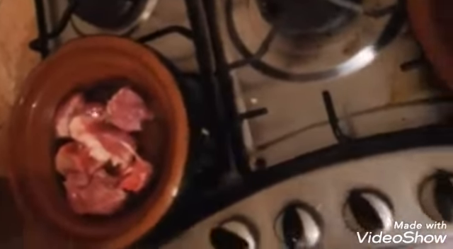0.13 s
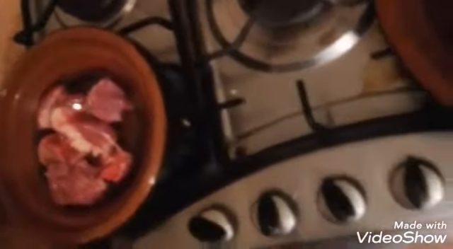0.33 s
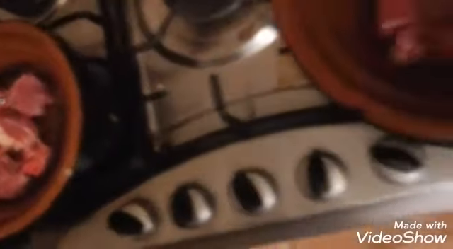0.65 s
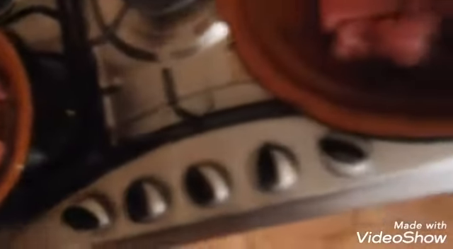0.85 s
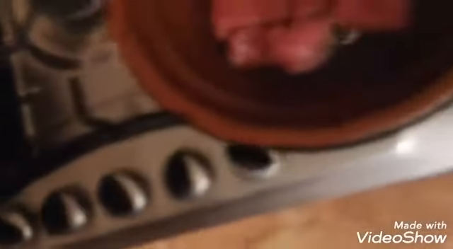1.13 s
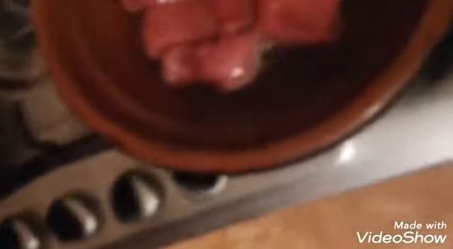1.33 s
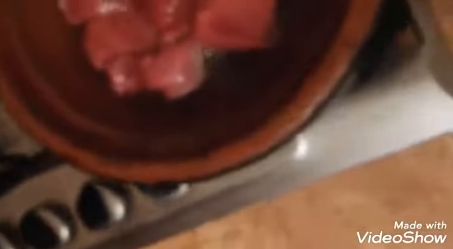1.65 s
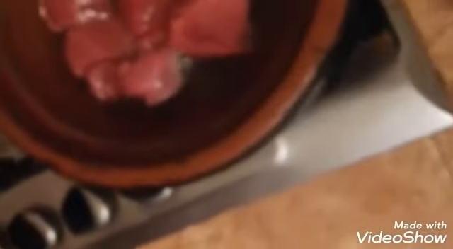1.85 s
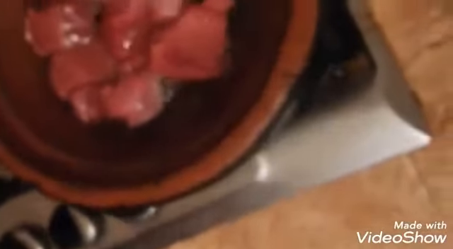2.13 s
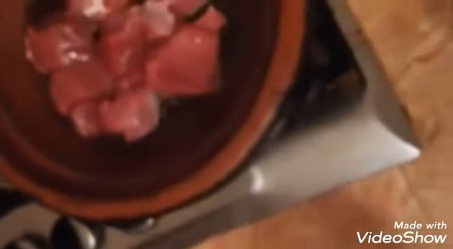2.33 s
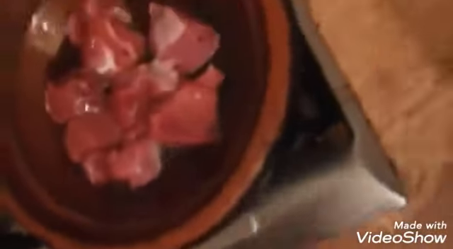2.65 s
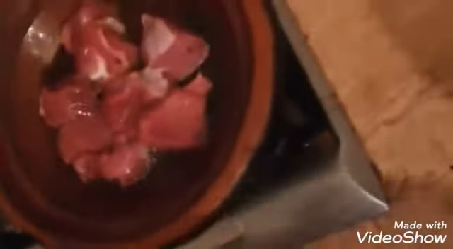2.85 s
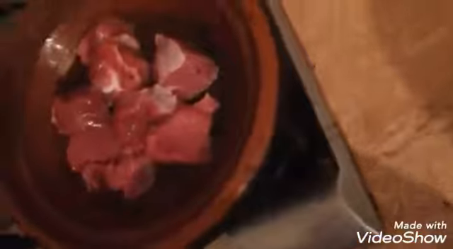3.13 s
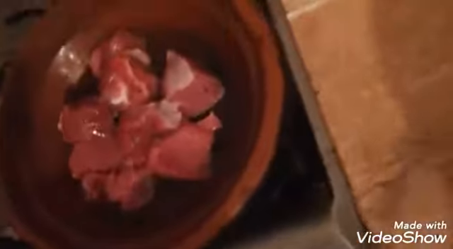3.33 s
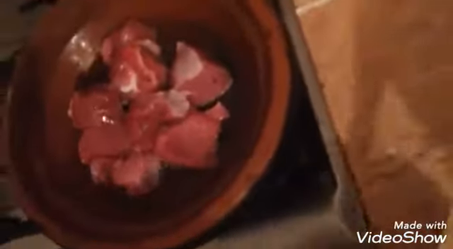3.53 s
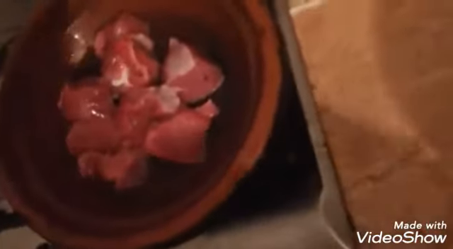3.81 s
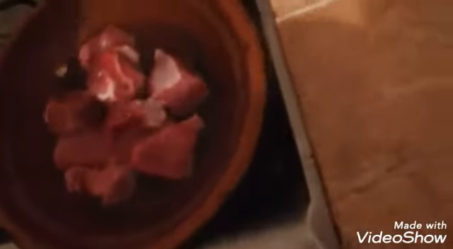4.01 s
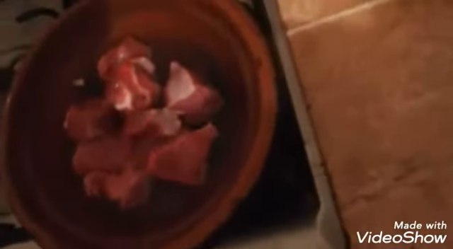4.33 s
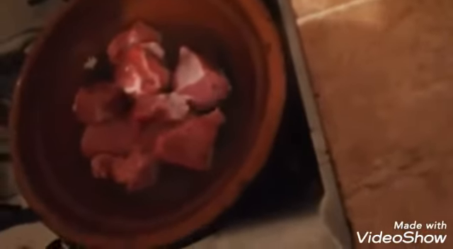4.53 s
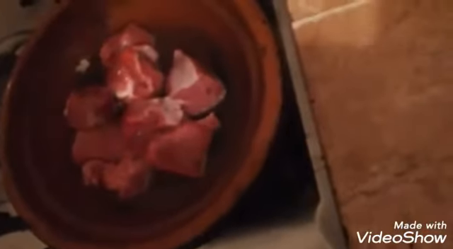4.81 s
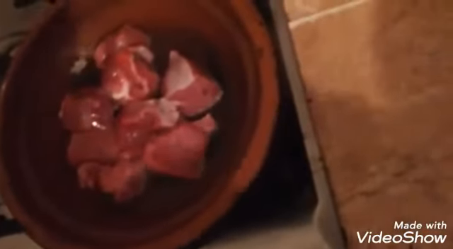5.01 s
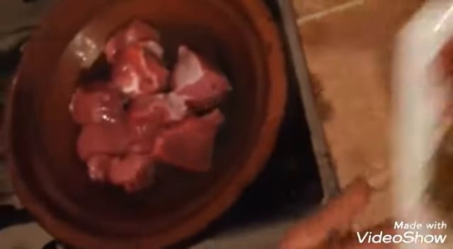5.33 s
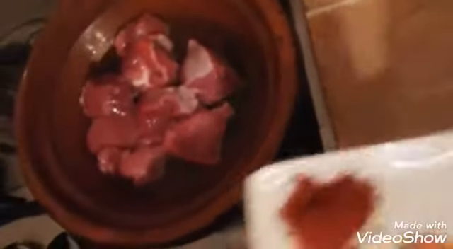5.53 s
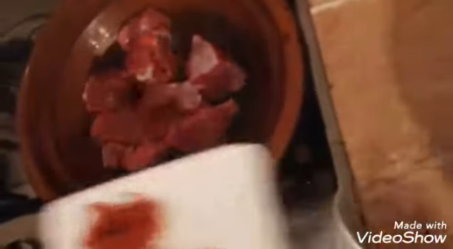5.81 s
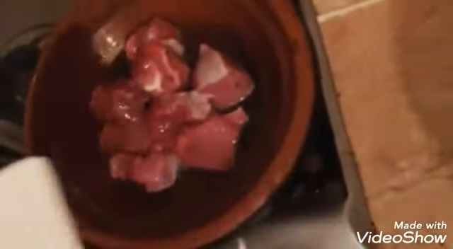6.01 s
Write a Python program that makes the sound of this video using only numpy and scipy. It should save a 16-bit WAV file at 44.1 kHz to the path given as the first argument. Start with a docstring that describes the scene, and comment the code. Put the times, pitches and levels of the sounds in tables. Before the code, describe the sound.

Meat sizzles softly in a clay pot throughout, heard close up in a small kitchen over the faint rush and hum of a gas flame. The frying is strongest at the start, with little spits of fat, then eases. Objects are set down with dull thuds right at the beginning and more softly around 1 second. At about 1.5 seconds a cupboard door bumps shut with a hollow boom. Near 3.2 seconds a utensil is laid down and rattles briefly. A plastic tub lid snaps sharply at 4 seconds, creaks faintly, and snaps again at about 4.4, the loudest moment. Crockery clinks and rings at 4.6 seconds, then rocks and slides faintly on the worktop. From 5 seconds more drops of fat pop, with a couple of soft thuds near 5.7, and the sizzle carries on to the end, just after 6 seconds.

```python
"""A small kitchen, heard close up: meat sizzles softly in a clay pot over a rushing, humming gas ring.
Steam bubbles hiss and crackle, and now and then a drop of fat spits. Beside the stove things are set
down, a cupboard door bumps shut, a utensil rattles, a spice tub's lid snaps twice and crockery clinks
and slides on the worktop. Each hit is a noise burst plus ringing modes, with a short room tail."""
import sys
import numpy as np
from scipy import signal
from scipy.fft import rfft, irfft, next_fast_len
from scipy.io import wavfile

SR = 44100
rng = np.random.default_rng(int(sys.argv[2]) if len(sys.argv) > 2 else 0)


def generate_wav(signal):
    """Clip the signal to [-1, 1] and save it as 16-bit WAV at the path in sys.argv[1]."""
    frames = np.transpose(np.atleast_2d(signal))
    scaled = np.clip(frames, -1, 1) * 32767
    pcm = np.round(scaled).astype(np.int16)
    wavfile.write(sys.argv[1], SR, pcm)


N = 271777
AGE = np.arange(30870) / SR  # time since a hit, t/s

# kitchen reverb decay: f/Hz, t60/s
ROOM_DECAY = [(150, 0.78), (500, 0.9), (1500, 0.49), (5000, 0.38), (12000, 0.3)]
# fader ride of the sizzle, highest while the microphone is close to the pot: t/s, level/dB
SIZZLE_RIDE = [(0.0, -43.5), (2.11, -49.5), (4.1, -49.5), (4.2, -48.5), (5.56, -50), (6.16, -48)]
# tone of the frying: f/Hz, level/dB
FRYING_EQ = [(80, -16), (200, -4.5), (500, 2.5), (900, 4.5), (1300, 1.5), (2000, 3), (2900, 2), (4000, 1),
             (5700, 2.5), (7500, -2.5), (11000, -2.5), (14000, -4.5), (16000, -52)]
# tone of the gas flame: f/Hz, level/dB
FLAME_EQ = [(20, 10.5), (45, 0.5), (75, -18), (120, -6.5), (180, 4.5), (300, 8), (450, 7), (700, -5.5),
            (1300, 12.5), (2500, -64), (6000, -8)]
# things set down or shifted: t/s, level/dB, low-pass/Hz, contact t60/s, hollow note/Hz, note/dB
THUD_CUES = [(0.0, -26.5, 1260, 0.25, 772, -10), (0.1847, -24.5, 1610, 0.012, 1204, -15),
             (.191, -26.5, 1260, 0.028, 413, -11), (.975, -36, 1150, 0.14, 420, -3.5),
             (1.018, -42, 1130, 0.13, 638, 4), (3.06, -41.5, 2300, 0.26, 202, -5.5),
             (3.575, -46, 1800, 0.11, 573, -9), (5.685, -40, 2570, 0.49, 367, -5.5),
             (5.751, -42.5, 1590, 0.24, 365, -1.5)]
# tone shared by those thuds: f/Hz, level/dB
THUD_EQ = [(70, -42), (140, -12), (260, -9), (400, -1), (700, 1.5), (1000, -2), (1500, 2.5), (3000, -3)]
# the loudest spits of fat: t/s, level/dB, f/Hz, width/Hz
SPIT_CUES = [(0.147, -44, 3070, 500), (0.2694, -41.5, 2960, 650), (0.2883, -41, 2650, 600),
             (.308, -46, 3800, 1500), (.3314, -43.5, 5200, 7000), (0.446, -46, 2530, 500),
             (.5153, -47.5, 3170, 550), (0.5438, -44, 5600, 3530), (0.59, -41.5, 2540, 480),
             (.645, -40.5, 3600, 9000), (0.689, -44, 2500, 900), (.689, -39, 5270, 5000),
             (0.7825, -44.5, 2910, 400), (.798, -46, 3200, 6000), (.8455, -43, 2950, 400),
             (.866, -46, 2970, 400), (.971, -48, 2500, 450), (0.988, -40, 2900, 350),
             (1.02, -48, 2700, 350), (1.0656, -48, 2850, 350), (1.084, -47, 2800, 350),
             (1.1402, -45, 3700, 2200), (1.149, -50, 2800, 900), (1.349, -47.5, 4180, 4500),
             (1.7803, -41.5, 2100, 3000), (5.148, -49, 2530, 400), (5.169, -47, 3020, 450),
             (5.184, -47, 3000, 352), (5.254, -45.5, 3500, 500), (5.301, -44.5, 2730, 700),
             (5.34, -46, 3300, 400), (5.369, -47.5, 3320, 400), (5.445, -50, 3180, 550),
             (5.5127, -43, 5800, 8000), (5.643, -42, 2850, 480), (6.003, -38.5, 3080, 500),
             (6.087, -38.5, 3400, 1014)]
# the door brushes its frame, then meets it: t/s, level/dB, ring/dB, low-pass/Hz
DOOR_CUES = [(1.441, -41, -4, 2000), (1.456, -35.5, 4.5, 2000), (1.5249, -25.5, 6.5, 750),
             (1.5407, -26, 12, 3000), (1.55, -25.5, -7, 3020)]
# tone of the door's knock: f/Hz, level/dB
DOOR_EQ = [(60, -31), (110, -20), (160, -5), (240, -5.5), (380, 5.5), (600, 4), (800, 2.5), (1000, -1.5),
           (1350, 2.5), (1900, -17.5), (2600, -14), (4000, -53)]
# the cupboard's boom: f/Hz, level/dB, t60/s
CUPBOARD_MODES = [(143, -11, 0.4), (203, -12, 0.5), (288, -7, 0.35), (356, -2, 0.4), (431, 3, 0.4),
                  (501, 1, 0.38), (544, 3, 0.38), (623, 4.5, 0.4), (687, 1.5, 0.36), (755, 1.5, 0.33),
                  (829, -3, 0.33), (883, -3, 0.33), (1112, -7, 0.48), (2570, -19, 0.35)]
# the latch rings as it first brushes the frame: t/s, level/dB, f/Hz, t60/s
LATCH_CUES = [(1.446, -41.5, 2385, 0.3)]
# slides on the worktop: t/s, length/s, level/dB, f/Hz, width/Hz
SCRAPE_CUES = [(3.209, 0.024, -47, 3300, 150), (4.823, .16, -47.5, 1525, 45),
               (4.912, .08, -52.5, 4680, 160)]
# the utensil is laid down and rattles: t/s, level/dB, low-pass/Hz, contact t60/s, ring/dB
RATTLE_CUES = [(3.232, -32.5, 11000, 0.078, 0), (3.2475, -38, 4200, 0.06, -8),
               (3.297, -39, 2300, 0.064, -7), (3.328, -45, 1900, 0.16, -13), (3.362, -50, 7000, 0.035, -8)]
# tone of the utensil's knock: f/Hz, level/dB
UTENSIL_EQ = [(120, -32), (300, -5), (900, -6.5), (1350, 4), (2300, -0.5), (3300, 0), (4000, -11),
              (4700, -3), (7500, -8.5), (11000, -9), (15000, -18)]
# the utensil's modes: f/Hz, level/dB, t60/s
UTENSIL_RING = [(534, -15.5, 0.33), (1273, -9.5, 0.21), (1990, -6, 0.15), (2645, -3, 0.07),
                (2716, -5, 0.066), (3350, -2, 0.052), (4500, 5, 0.02), (4880, 4, 0.021), (5900, -5, 0.046)]
# the lid's two catches snap and rebound: t/s, level/dB, low-pass/Hz, which catch, crack/dB, tub/dB
SNAP_CUES = [(3.9927, -17, 14800, "front", -8.5, -23), (4.0496, -29, 13800, "front", -1, -13),
             (4.3505, -13.5, 12000, "back", -14, -23.5), (4.3532, -28, 15600, "back", 5.5, -8.5),
             (4.40, -22.5, 5100, "back", -11, -13.5)]
# tone of the lid's crack: f/Hz, level/dB
LID_EQ = [(90, -27), (170, -18), (400, -9), (700, -8.5), (1080, -2), (1600, -2), (2300, -4.5), (3100, 4),
          (3700, 2.5), (5000, 1.5), (6000, 2.5), (7800, -3), (9700, 1), (11000, -1), (13200, -2),
          (16000, -25)]
# modes of the "front" and the "back" catch: f/Hz, level/dB, t60/s
CATCH_RING = {"front": [(1140, -10.5, 0.022), (2800, -5, 0.02), (3170, -3, 0.024), (5300, 1.5, 0.017),
              (6000, -2, 0.013), (6530, -5.5, 0.023), (9500, 1.5, 0.0045), (12800, -12, 0.0036)],
              "back": [(2200, -13, 0.014), (3230, -8, 0.016), (3700, -4.5, 0.014), (4572, 0, 0.03),
              (5070, -9, 0.014), (6040, -1.5, 0.015)]}
# the hollow tub's modes: f/Hz, level/dB, t60/s
TUB_RING = [(351, -5, 0.096), (540, -5, 0.08), (785, -10, 0.06), (1054, -2.5, 0.06), (1410, 1.5, 0.055),
            (2190, 11, 0.023)]
# plastic creaks under the thumb before it gives: t/s, level/dB, f/Hz
CREAK_CUES = [(4.234, -46, 3680), (4.241, -43.5, 5200), (4.262, -42, 3420), (4.282, -46, 3500),
              (4.307, -41.5, 3400), (4.326, -45, 4600)]
# crockery is put down and rocks: t/s, level/dB, low-pass/Hz, ring/dB, chatter/dB
CLINK_CUES = [(4.509, -49.5, 1870, -6, 7), (4.6184, -23, 2880, -8, 1.5), (4.622, -24, 5750, 4, -18),
              (4.6343, -22.5, 5000, -10, -21), (4.737, -34, 3000, -13, 8), (4.902, -45, 2000, 6, -7)]
# tone of the crockery's knock: f/Hz, level/dB
CROCKERY_EQ = [(90, -33), (180, -15.5), (400, -6.5), (700, -5.5), (1050, -4), (1550, 6.5), (2100, -3),
               (2900, 1), (3400, 7.5), (4000, -10), (4800, 0.5), (6000, -19), (12000, -28)]
# the crockery's paired modes: f/Hz, level/dB, t60/s
CROCKERY_RING = [(1376, -3, .16), (1496, 0, 0.28), (1556, -1.5, 0.31), (1809, -12, 0.38),
                 (3327, -2.5, 0.42), (3406, -2.5, 0.42), (4673, -12, 0.6), (4760, -9, 0.42),
                 (7876, -12, 0.09), (8323, -9, .08)]


def from_db(db):
    """Decibels to gain."""
    return 10 ** (np.asarray(db) / 20)


def rms_one(x):
    """Scale to rms 1."""
    return x / np.sqrt(np.mean(x ** 2) + 1e-20)


def unit_hit(x):
    """Scale to the energy of 10 ms at rms 1."""
    return x * np.sqrt(SR / 100 / (np.sum(x ** 2) + 1e-20))


def at_hz(points, hz):
    """Read a curve on a log-frequency axis."""
    points = np.array(points)
    return np.interp(np.log(np.maximum(hz, 1)), np.log(points[:, 0]), points[:, 1])


def eq(x, curve):
    """Minimum-phase EQ: nothing rings ahead of an attack."""
    size = 2 * next_fast_len(len(x) // 2 + SR // 10)
    gains = from_db(at_hz(curve, np.fft.rfftfreq(size, 1 / SR)))
    cepstrum = irfft(np.log(gains))
    cepstrum[1:size // 2] *= 2
    cepstrum[size // 2 + 1:] = 0
    return irfft(rfft(x, size) * np.exp(rfft(cepstrum)))[:len(x)]


def pass_filter(x, hz, kind, order=2):
    """Low- or high-pass."""
    sos = signal.butter(order, min(hz, SR / 2 - 1000), kind, fs=SR, output="sos")
    return signal.sosfilt(sos, x + 1e-18)


def resonate(x, hz, width_hz):
    """One resonant peak."""
    radius = np.exp(-np.pi * width_hz / SR)
    feedback = [1, -2 * radius * np.cos(2 * np.pi * hz / SR), radius ** 2]
    return signal.lfilter([1, 0, -1], feedback, x + 1e-18) * (1 - radius ** 2) / 2


def fade(t60):
    """Exponential decay, 60 dB down after t60 seconds."""
    return np.exp(-np.log(1000) * AGE / t60)


def burst(t60):
    """A contact's dense, quickly dying vibration, with a flat spectrum."""
    decay = fade(t60)
    noise = rng.standard_normal(len(AGE)) * decay
    whitened = irfft(np.exp(1j * np.angle(rfft(noise))))
    return whitened * decay ** 0.1 * (AGE < t60)


def knock(t60, curve, top_hz):
    """The attack of a hit: a burst in the object's tone, low-passed to set its hardness."""
    return unit_hit(pass_filter(eq(burst(t60), curve), top_hz, "low"))


def ring(modes):
    """Struck modes: decaying sines at random phases."""
    return sum(from_db(db) * fade(t60) * np.sin(2 * np.pi * (hz * AGE + rng.random()))
               for hz, db, t60 in modes)


def add(track, t, sound):
    """Mix a sound in at t seconds."""
    start = max(round(t * SR), 0)
    track[start:start + len(sound)] += sound[:N - start]


def in_kitchen(sound, room_db, build_s=0.00082):
    """Direct sound plus diffuse reflections, which build up and then die soonest in the treble."""
    white = rfft(rng.standard_normal(len(AGE)))
    hz = np.fft.rfftfreq(len(AGE), 1 / SR)
    splits_hz = [0, 300, 1000, 3000, 7500, SR / 2]
    walls = sum(irfft(white * (hz >= low) * (hz < high)) * fade(at_hz(ROOM_DECAY, (low + high) / 2))
                for low, high in zip(splits_hz, splits_hz[1:]))
    walls *= 1 - np.exp(-(AGE / build_s) ** 2)
    tail = signal.fftconvolve(sound, walls / np.linalg.norm(walls))[:len(sound)]
    return sound + from_db(room_db) * np.std(sound) * rms_one(tail)


def ride(db, follows):
    """A layer's gain: db at the mean sizzle, moving by `follows` dB per dB of sizzle."""
    sizzle_db = np.interp(np.arange(N) / SR, *np.transpose(SIZZLE_RIDE))
    return from_db(db + follows * (sizzle_db - sizzle_db.mean()))


def pop(x, hz, width_hz):
    """A bubble's note swells and dies within a few milliseconds: the same resonance twice."""
    return resonate(resonate(x, hz, width_hz), hz, width_hz)


def bubbles(per_s, spread_db, pitches_hz, width_share):
    """Bubbles burst at random moments, each with its own size and pitch; rms 1."""
    sizes = from_db(spread_db * np.minimum(rng.exponential(1, N), 3.5))
    polarity = rng.choice([-1, 1], N)
    clicks = sizes * polarity * (rng.random(N) < per_s / SR)
    pitch_index = rng.integers(0, len(pitches_hz), N)
    return rms_one(sum(pop(clicks * (pitch_index == k), hz, hz * width_share)
                       for k, hz in enumerate(pitches_hz)))


def swells(per_s):
    """A slow random drift around zero."""
    points = rng.standard_normal(int(per_s * N / SR) + 2)
    return np.interp(np.arange(N) * per_s / SR, np.arange(len(points)), points)


def frying():
    """Tiny steam bubbles merge to a hiss; larger ones crackle and the wettest pop in clusters."""
    hiss = rms_one(eq(rng.standard_normal(N), FRYING_EQ))
    crackle = bubbles(per_s=1700, spread_db=6, pitches_hz=np.geomspace(1300, 11000, 20), width_share=0.55)
    crackle = ride(-51.5, follows=1.41) * rms_one(eq(crackle, FRYING_EQ))
    pops = bubbles(per_s=110, spread_db=2.5, pitches_hz=np.geomspace(2450, 3600, 10), width_share=0.1)
    pops *= ride(-59, follows=0.79) * from_db(2.9 * swells(per_s=7.2))
    smeared = in_kitchen(crackle + pops, room_db=-1.5)  # by pot and walls
    return ride(-48, follows=0.69) * hiss + smeared


def flame(hum_db=-61.5, throb_db=4, period_s=0.913, crest_s=3.85):
    """A soft rush of burning gas over a narrow hum that throbs slowly."""
    rush = rms_one(eq(rng.standard_normal(N), FLAME_EQ))
    hum = rms_one(resonate(rng.standard_normal(N), hz=333, width_hz=10))
    throb = np.cos(2 * np.pi * (np.arange(N) / SR - crest_s) / period_s)
    return ride(-55.5, follows=0.98) * rush + from_db(hum_db + throb_db * throb) * hum


def thuds(attack_share=0.018, note_t60=0.19):
    """Things land softly, each with a dull hollow note; longer contacts are short slides that ease in."""
    out = np.zeros(N)
    for t, db, top_hz, t60, note_hz, note_db in THUD_CUES:
        attack = 1 - np.exp(-AGE / (attack_share * t60))
        body = eq(attack * burst(t60), THUD_EQ)
        body = unit_hit(pass_filter(body, top_hz, "low", order=6))
        note = attack * ring([(note_hz, 0, note_t60)])
        note = from_db(note_db) * unit_hit(pass_filter(note, top_hz, "low", order=6))
        add(out, t, from_db(db) * in_kitchen(body + note, room_db=-3))
    return out


def spits():
    """Single drops burst in the hot fat: big ones pop at a clear pitch, small ones only tick."""
    out = np.zeros(N)
    click = signal.unit_impulse(SR // 20)
    for t, db, hz, width_hz in SPIT_CUES:
        add(out, t, from_db(db) * unit_hit(pop(click, hz, width_hz)))
    return in_kitchen(pass_filter(out, 13000, "low"), room_db=-6)


def door(knock_t60=0.045):
    """The latch rings, the door knocks on its frame and the cupboard booms."""
    out = np.zeros(N)
    for t, db, ring_db, top_hz in DOOR_CUES:
        bump = in_kitchen(knock(knock_t60, DOOR_EQ, top_hz), room_db=4)
        boom = unit_hit(pass_filter(ring(CUPBOARD_MODES), top_hz, "low", order=4))
        add(out, t, from_db(db) * (bump + from_db(ring_db) * boom))
    for t, db, hz, t60 in LATCH_CUES:
        add(out, t, from_db(db) * unit_hit(ring([(hz, 0, t60)])))
    return pass_filter(out, 100, "high", order=6)  # wood radiates little deep bass


def scrapes():
    """Friction keeps one mode of a sliding object singing; it swells and fades with the stroke."""
    out = np.zeros(N)
    for t, length_s, db, hz, width_hz in SCRAPE_CUES:
        stroke = signal.windows.tukey(int(length_s * SR), 0.5)
        note = resonate(rng.standard_normal(len(stroke)), hz, width_hz)
        add(out, t, from_db(db) * rms_one(stroke * note))
    return out


def utensil():
    """A light knock, then ever softer touches as the utensil settles; each rings the same modes."""
    out = np.zeros(N)
    for t, db, top_hz, t60, ring_db in RATTLE_CUES:
        tap = knock(t60, UTENSIL_EQ, top_hz)
        tone = from_db(ring_db) * unit_hit(pass_filter(ring(UTENSIL_RING), top_hz, "low"))
        add(out, t, from_db(db) * in_kitchen(tap + tone, room_db=-1.5))
    return out


def lid(crack_t60=0.024):
    """Stiff plastic snaps and creaks; a snap layers a crack, the catch's brief ring and the tub's note."""
    out = np.zeros(N)
    for t, db, top_hz, catch, crack_db, tub_db in SNAP_CUES:
        crack = from_db(crack_db) * knock(crack_t60, LID_EQ, top_hz)
        tone = unit_hit(pass_filter(ring(CATCH_RING[catch]), top_hz, "low"))
        tub = from_db(tub_db) * unit_hit(ring(TUB_RING))
        snap = in_kitchen(crack, room_db=-2.5)
        snap += in_kitchen(tone, room_db=-13)
        snap += in_kitchen(tub, room_db=-2)
        add(out, t, from_db(db) * snap)
    for t, db, hz in CREAK_CUES:
        creak = resonate(burst(t60=0.034), hz, width_hz=1100)
        add(out, t, from_db(db) * unit_hit(creak))
    return pass_filter(out, 150, "high", order=4)


def crockery(knock_t60=0.042, chatter_hz=1635, chatter_t60=0.058):
    """Each touch knocks and rings, duller when gentle; the foot chatters briefly on the worktop."""
    out = np.zeros(N)
    for t, db, top_hz, ring_db, chatter_db in CLINK_CUES:
        tap = knock(knock_t60, CROCKERY_EQ, top_hz)
        tone = from_db(ring_db) * unit_hit(pass_filter(ring(CROCKERY_RING), top_hz, "low", order=4))
        chatter = from_db(chatter_db) * unit_hit(ring([(chatter_hz, 0, chatter_t60)]))
        clink = in_kitchen(tap, room_db=-2) + in_kitchen(chatter, room_db=-8.5) + tone
        add(out, t, from_db(db) * clink)
    return pass_filter(out, 160, "high", order=4)


def scene():
    """The stove's bed and the spot effects in one mono mix, the same in both channels."""
    mono = frying() + flame() + thuds() + spits() + door() + scrapes() + utensil() + lid() + crockery()
    return np.array([mono, mono])


def record(dry, ceiling=0.85, cutoff_hz=15700):
    """Clip the peaks just under full scale, then cut the top steeply."""
    high_cut = signal.ellip(10, 0.1, 80, cutoff_hz, fs=SR, output="sos")
    return signal.sosfilt(high_cut, np.clip(dry, -ceiling, ceiling))


dry = scene()
out = record(dry)
generate_wav(out)
```